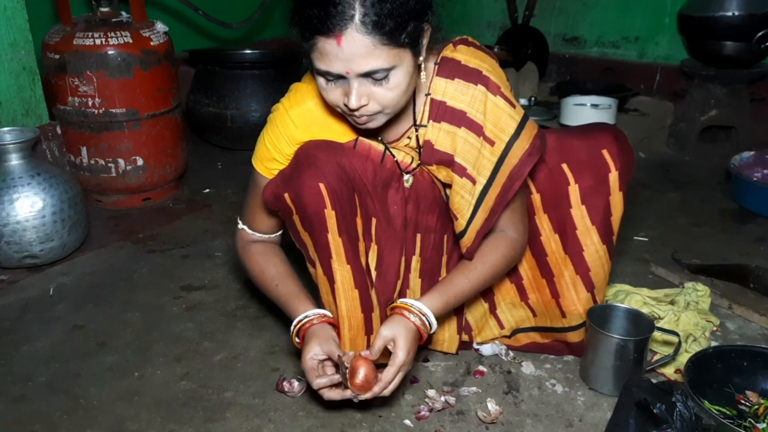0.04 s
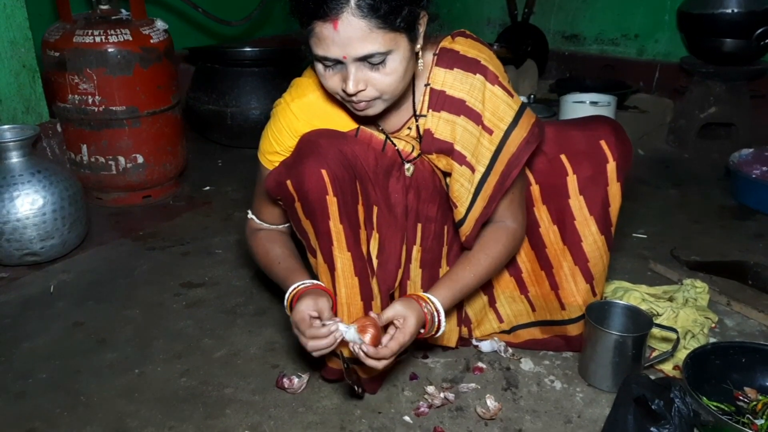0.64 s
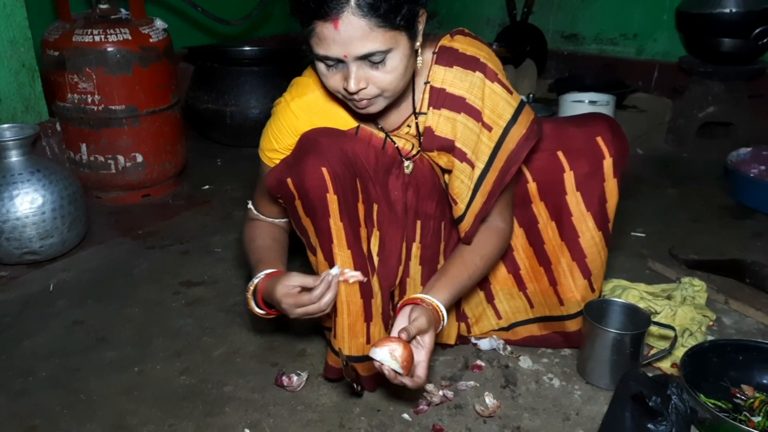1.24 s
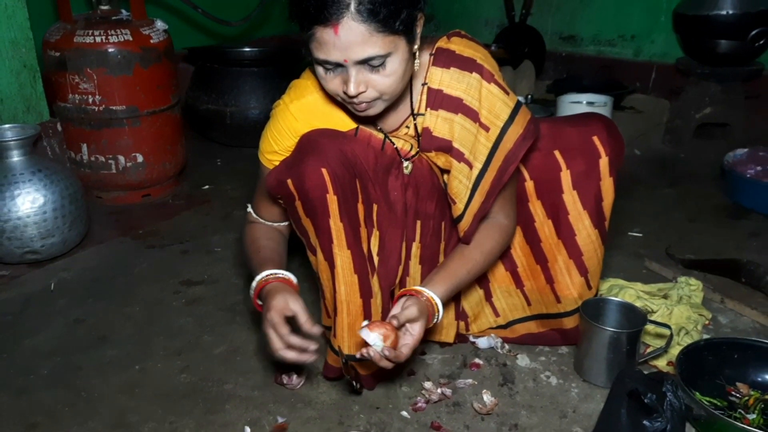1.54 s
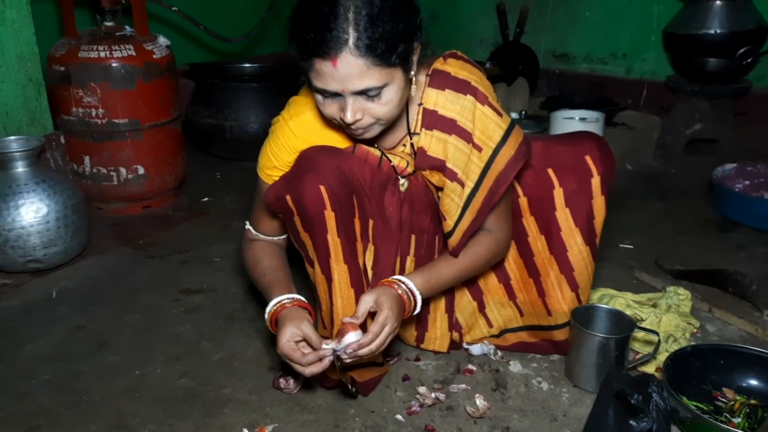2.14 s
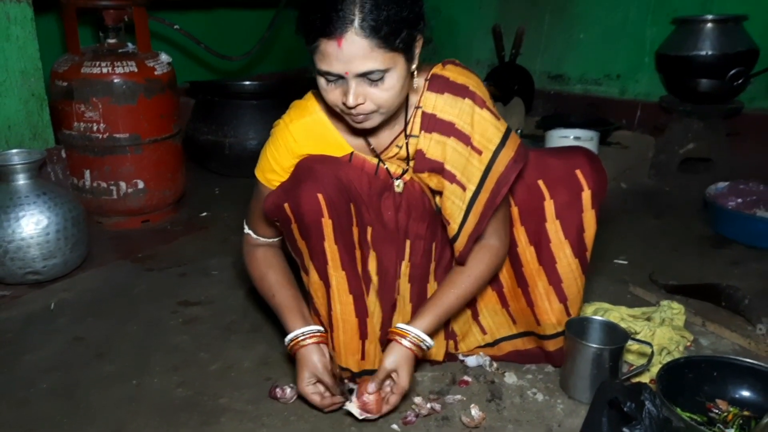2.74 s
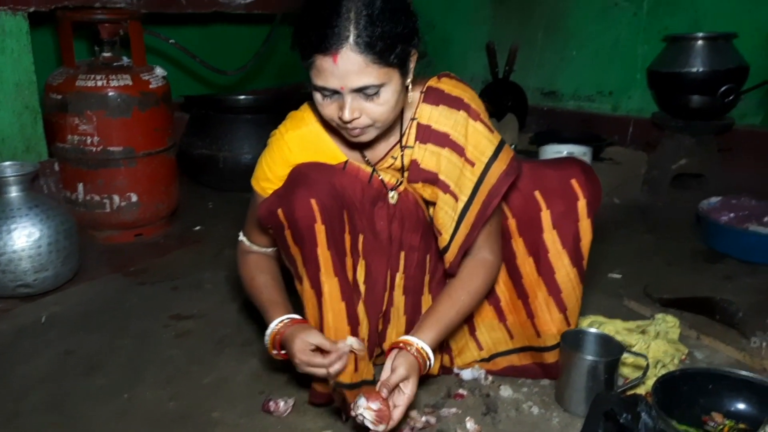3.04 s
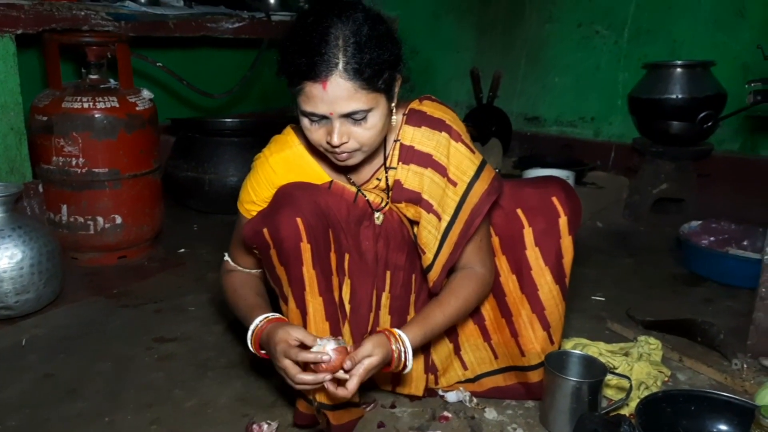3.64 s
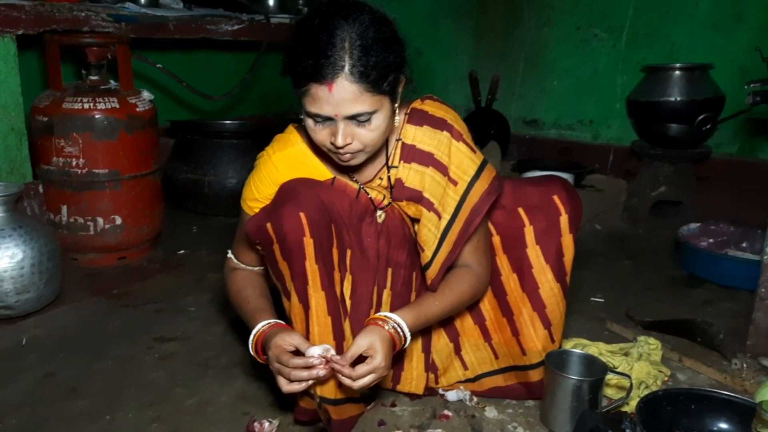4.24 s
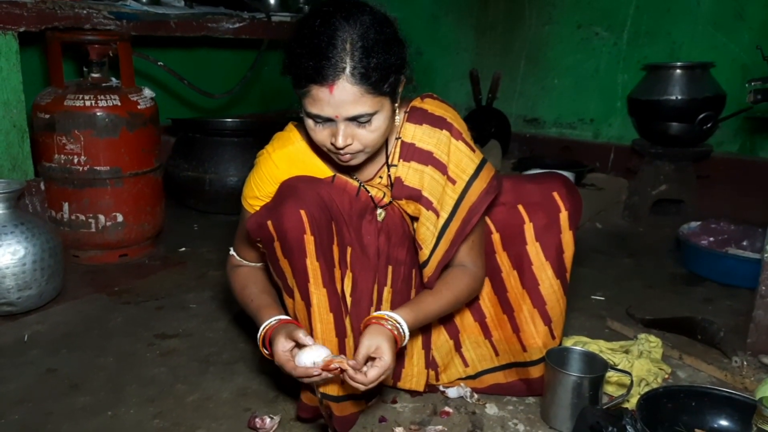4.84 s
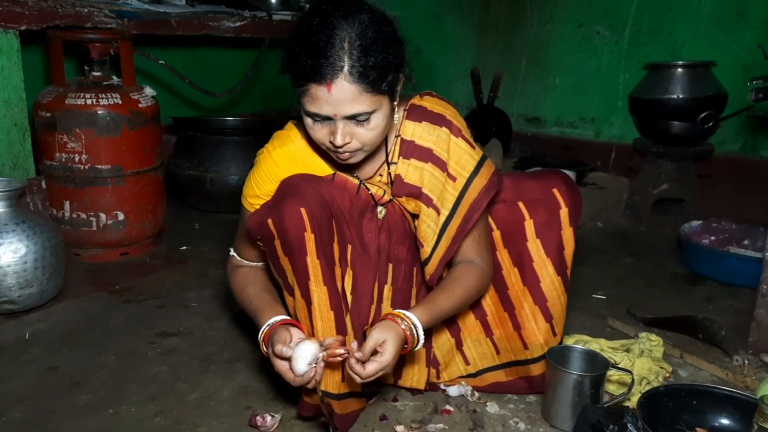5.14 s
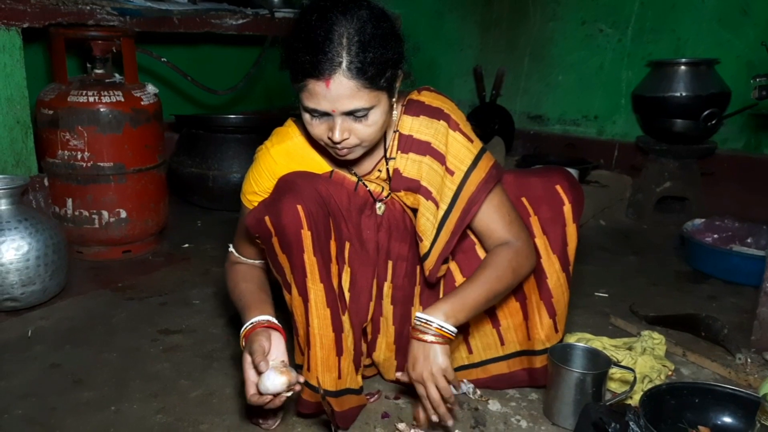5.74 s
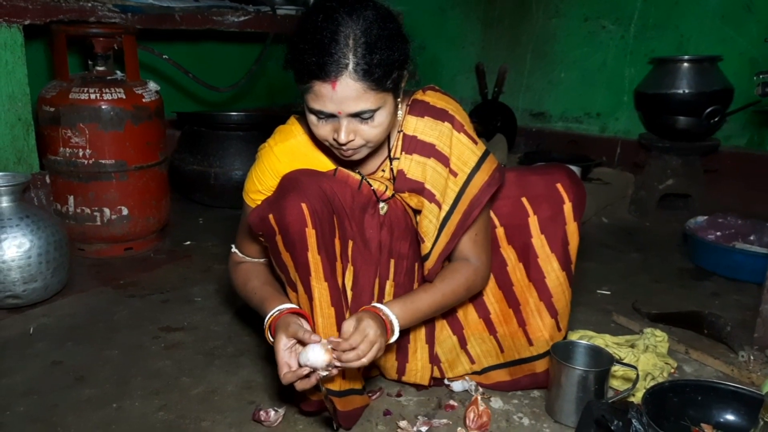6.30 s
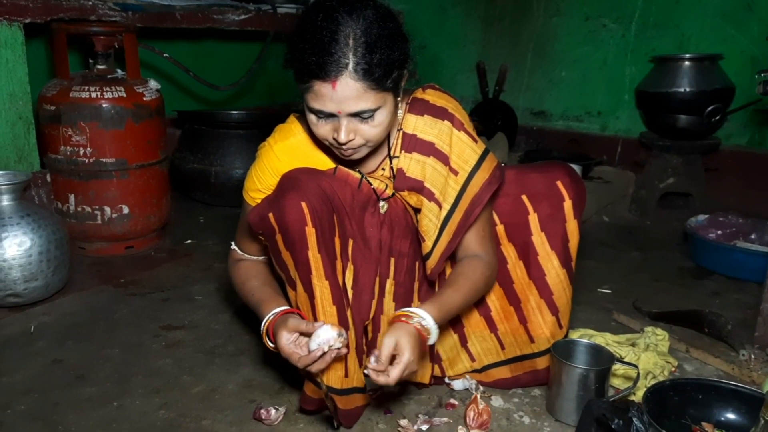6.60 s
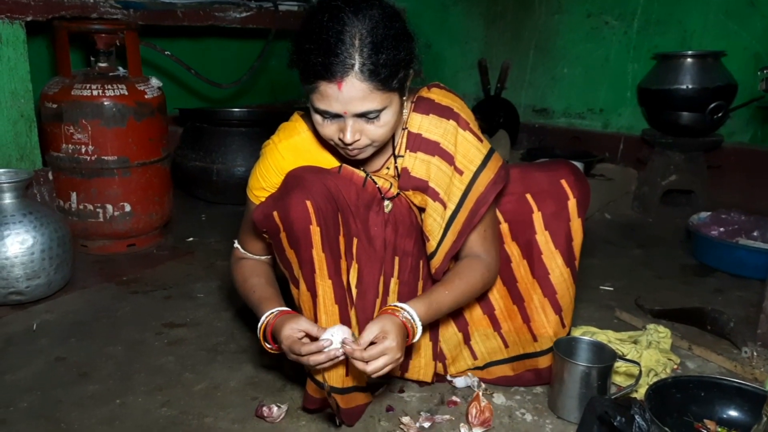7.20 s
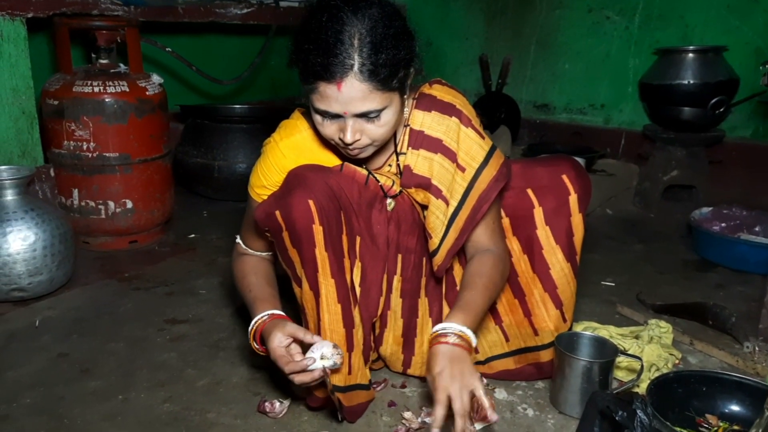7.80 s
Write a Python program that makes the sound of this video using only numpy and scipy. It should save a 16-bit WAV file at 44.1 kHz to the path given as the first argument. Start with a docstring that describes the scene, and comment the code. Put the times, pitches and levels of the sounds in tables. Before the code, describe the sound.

Fingers peel dry, papery skin off an onion in a small, quiet kitchen. Each pull is a brief crackling rustle with a few sharper snaps and light fingertip rubbing. The pulls come in irregular clusters, loudest a little before and a little after the middle, then thin out to faint ticks. The sound is fairly close, with slight room reflection over a faint hum and hiss.

```python
"""A dry crackle, pull after pull: fingers peel papery skin off a garlic bulb in a small kitchen.
Each pull is a swarm of tiny fractures with a few louder snaps; the freed flake flexes, fingertips
rub and knock on the bulb. Hard floor and walls smear the cracks into a rustle.
Underneath: faint mains hum, low room murmur, hiss with a narrow high band, soft bumps of hands
and feet, and a far drone that comes and goes."""
import sys
import numpy as np
from scipy import signal
from scipy.fft import rfft, irfft
from scipy.io import wavfile
from scipy.ndimage import uniform_filter1d

SR = 44100
rng = np.random.default_rng(int(sys.argv[2]) if len(sys.argv) > 2 else 0)


def store_pcm(level_fs):
    """Save levels as 16-bit WAV."""
    pcm = np.round(np.clip(level_fs, -1, 1) * 32767).astype(np.int16)
    wavfile.write(sys.argv[1], SR, np.atleast_2d(pcm).T)


N = 346626
T = np.arange(N) / SR
HZ = np.fft.rfftfreq(N, 1 / SR)

# room murmur spectrum: f/Hz, relative level/dB
MURMUR_SPECTRUM = [(25, -20), (50, -8), (85, -0.5), (120, 0), (150, -10.5), (220, -6.5), (300, -11),
                   (500, -15.5), (800, -24), (1500, -27.5), (4000, -57)]
# hiss spectrum: f/Hz, relative level/dB
HISS_SPECTRUM = [(200, 5), (1500, -1), (2600, 6.5), (5000, 1), (6000, 0), (8200, 6.5), (10300, 0.5),
                 (12300, 2.5), (14000, 2.5), (15500, 5.5)]
# hum: f/Hz, level/dB, waver/0-1
HUM_TONES = [(99.8, -72, .5), (223, -87.5, 0.92)]
# far tones: start/s, end/s, f/Hz, level/dB
DRONE_TONES = [(2.043, 2.494, 441, -76.5), (3.15, 3.755, 496, -83.5), (4.553, 4.847, 440, -83.5),
               (4.865, 5.095, 440, -67.5)]
# hands and feet: t/s, relative level/dB
BODY_BUMPS = [(0.71, -65), (0.997, -59.5), (1.189, -59.5), (2.442, -51), (2.799, -53.5), (3.018, -51),
              (6.331, -65), (7.399, -57), (7.458, -54.5), (7.509, -64)]
# floor and wall reflections: delay/s, spread/s, level/dB
EARLY_ECHOES = [(.0003, 0.0063, -14.5), (.0022, 0.001, -8.5), (.009, 0.0013, -23), (0.0099, 0.0031, -27.5)]
# kitchen decay: f/Hz, T60/s
KITCHEN_T60 = [(300, 0.41), (1300, 0.33), (3500, 0.34), (9000, .34), (15000, 0.27)]
# spectrum of breaking skin: f/Hz, relative level/dB
SKIN_SPECTRUM = [(130, -10.5), (220, -13), (350, -8), (600, -7), (1100, -8.5), (1500, -9), (2200, -3.5),
                 (3600, -4.5), (6600, 6.5), (9500, 0.5), (12300, 2), (14000, 0), (15500, -4.5)]
# resonances and one dip of the held bulb: f/Hz, width/Hz, gain/dB
BULB_RESONANCES = [(730, 90, 3.5), (880, 120, 5), (1120, 150, -3), (1500, 180, 5), (2480, 220, 3.5),
                   (2950, 200, 2.5)]
# loose skin crackling during and between pulls: t/s, relative level/dB
LOOSE_CRACKLE = [(0.0, -55.5), (0.65, -78.5), (0.83, -56), (1.09, -58), (1.36, -76), (2.19, -75.5),
                 (2.65, -50), (2.96, -56.5), (3.17, -70.5), (3.94, -75.5), (4.9, -57), (5.25, -61),
                 (5.98, -77.5), (7.86, -82)]
# fingertip on the bulb: t/s, level/dB
FINGER_KNOCKS = [(0.041, -32.5), (1.185, -24.5), (4.833, -16.5)]
# single loud fractures: t/s, level/dB, flex/dB re level
SKIN_SNAPS = [(0.043, -26, 5), (0.4012, -20, -39), (1.0053, -10, -9.5), (1.0623, -23, -25),
              (1.1858, -5.5, -6), (1.554, -27, -9), (2.202, -25, -20), (2.3406, -12, -12),
              (2.499, -10, -15), (2.5587, -13, 3.5), (2.65, -5.5, -2.5), (2.6897, 1.5, -16), (2.708, 2, -3),
              (3.4335, -22, -9), (3.682, -20, -13.5), (4.099, -28.5, -13.5), (4.2417, -13, -25),
              (4.408, -34, 10.5), (4.5416, -28.5, 3), (4.6948, -16.5, -16.5), (4.73, -5.5, -27),
              (4.775, 3, -15.5), (5.047, -13.5, 0), (5.0991, -14, 1.5), (5.291, -20, -5),
              (5.3765, -11.5, -13.5), (5.4301, -9, -12), (5.814, -13, -25), (7.032, -33.5, -29),
              (7.2893, -30.5, -28)]
# pulls: start/s, rise/s, length/s, effort/dB, flex/dB re effort, rub/dB re effort,
# dryness as treble gain/dB, resonance of the finger pocket/Hz
SKIN_PULLS = [(0.0, 0.0013, 0.052, -43, -11.5, -26.5, -1.5, 2680),
              (0.19, 0.066, 0.14, -63.5, -17, -20, 1.5, 4000), (0.592, 0.062, 0.21, -42, -6, -34, -1, 2600),
              (0.793, 0.013, 0.05, -29, -7.5, -39, -11, 5640),
              (0.837, 0.028, 0.17, -41, -1, -20.5, 3, 2200), (1.11, 0.044, 0.08, -36, -3, -17, 1, 2160),
              (1.526, 0.023, 0.045, -58, 0.5, -15.5, 0, 2380),
              (2.2, .01, 0.15, -61.5, -12, -25, -3.5, 2470), (2.336, 0.009, 0.072, -56, -1, -24, 1, 2430),
              (2.421, 0.063, 0.16, -46, -5, -23.5, 2.5, 2360),
              (2.654, .01, 0.052, -39.5, 3.5, -21, 0.5, 2280),
              (2.678, 0.016, 0.091, -27, -7, -26, -3, 2050),
              (2.929, 0.068, 0.14, -29.5, -5.5, -18, .5, 2300),
              (3.285, 0.019, 0.099, -65.5, -6, -34, 2, 2430),
              (3.41, .018, 0.062, -55.5, -9.5, -37, -2, 2410),
              (3.673, 0.0087, 0.078, -64.5, -5.5, -12, -2.5, 2350),
              (4.362, 0.068, 0.082, -52.5, -2, -28, 4.5, 2240),
              (4.528, 0.016, .11, -59, -4, -37.5, -1.5, 2550),
              (4.687, 0.042, .12, -38.5, -0.5, -27.5, -5, 2530),
              (4.798, 0.013, .085, -45.5, 8.5, -9.5, 4, 1450),
              (5.004, 0.029, 0.12, -51.5, 6.5, -2, 0, 3700),
              (5.148, 0.023, 0.17, -59.5, 3.5, -12.5, 0.5, 2980),
              (5.411, 0.017, 0.038, -35.5, -1, -23, -5, 2850),
              (5.809, 0.032, 0.052, -44.5, -4.5, -16.5, -9, 4270),
              (6.408, 0.034, 0.056, -61.5, -8.5, -35, 3, 2580),
              (7.412, 0.021, 0.18, -67.5, -15, -24, 1.5, 4540)]
# microphone ports: f/Hz, left minus right/dB
PORT_BALANCE = [(100, 0), (500, 2.5), (1200, 1), (2400, -5), (4300, -2), (6000, -5.5), (7200, -11),
                (8050, -0.5), (8800, 19), (9600, 6.5), (10700, 12), (11600, 5), (15000, 1.5)]

# layer timing in a pull: lag/s, change along the pull/dB, release time constant/s
TEAR, FLEX, RUB = (0, -2.3, 0.012), (0.001, 0.94, 0.032), (0.008, 3.6, 0.034)
START_S, RISE_S, LENGTH_S, EFFORT_DB, FLEX_DB, RUB_DB, DRYNESS_DB, POCKET_HZ = np.transpose(SKIN_PULLS)


def amp(db):
    """Decibels to gain."""
    return 10 ** (np.asarray(db) / 20)


def lookup(table, hz):
    """Interpolates on a log-frequency axis."""
    f, value = np.transpose(table)
    return np.interp(np.log(hz + 1), np.log(f + 1), value)


def add(mix, at_s, sound):
    """Mixes a sound in, in place."""
    part = mix[max(round(at_s * SR), 0):][:len(sound)]
    part += sound[:len(part)]


def noise(gain):
    """Noise of rms 1, shaped by a gain per frequency."""
    x = irfft(rfft(rng.standard_normal(N)) * gain, N)
    return x / np.sqrt(np.mean(x ** 2) + 1e-20)


def drift(rate_hz):
    """Slow random motion of rms 1."""
    return noise(np.exp(-(HZ / rate_hz) ** 2))


def room_murmur(level_db=-71.5, shared_power=0.39):
    """Low stereo noise, partly common to both sides."""
    gain = amp(lookup(MURMUR_SPECTRUM, HZ))
    shared = np.sqrt(shared_power) * noise(gain)
    separate = np.sqrt(1 - shared_power) * np.array([noise(gain), noise(gain)])
    return amp(level_db) * (shared + separate)


def mains_hum():
    """Low tones wavering in level and phase."""
    hum = np.zeros(N)
    for hz, db, waver in HUM_TONES:
        wobble = waver * (drift(11) + 1j * drift(9.5))
        hum += amp(db) * ((np.sqrt(2) + wobble) * np.exp(2j * np.pi * hz * T)).real
    return hum


def hiss(broad_db=-75, band_db=-68.5, band_hz=6850, half_width_hz=365, flutter_db=2.4, lean_db=1):
    """Even hiss plus a narrow fluttering band; separate noise per side, leaning right."""
    broad_gain = amp(lookup(HISS_SPECTRUM, HZ))
    band_gain = 1 / (1 + abs((HZ - band_hz) / half_width_hz) ** 3)
    band_level = amp(band_db + flutter_db * drift(12))
    return np.array([amp(side_db) * (amp(broad_db) * noise(broad_gain) + band_level * noise(band_gain))
                     for side_db in (-lean_db, lean_db)])


def far_drone(waver=0.0193):
    """Unsteady tones that fade in and out."""
    drone = np.zeros(N)
    for start_s, end_s, hz, db in DRONE_TONES:
        fade = np.sin(np.pi * np.clip((T - start_s) / (end_s - start_s), 0, 1))
        phase = 2 * np.pi * np.cumsum(hz * (1 + waver * drift(38))) / SR
        drone += amp(db) * fade * np.sqrt(2) * np.sin(phase)
    return drone


def body_bumps(centre_hz=92, width_oct=1.0, rise_s=0.023, gain_db=-7):
    """Short swells of rumble as the body shifts."""
    swell = np.zeros(N)
    age = T[:SR // 2] / rise_s
    for at_s, db in BODY_BUMPS:
        add(swell, at_s - rise_s / 2, amp(db + gain_db) * age * np.exp(1 - age))
    octaves = np.log2((HZ + 1) / centre_hz)
    return swell * noise(np.exp(-(octaves / width_oct) ** 2))


def room_path(direct_db, mean_lag_s, tail_db=-3, build_s=0.0058):
    """One hand position to one microphone: diffuse tail, early echo clusters, direct sound."""
    t = T[:SR // 2]
    hz, frame_s, spectra = signal.stft(rng.standard_normal(len(t)), SR, nperseg=256)
    decay = amp(-60 * frame_s / lookup(KITCHEN_T60, hz)[:, None])
    tail = signal.istft(spectra * decay, SR, nperseg=256)[1][:len(t)]
    tail *= 1 - np.exp(-(t / build_s) ** 2)
    response = amp(tail_db) * tail / np.linalg.norm(tail)
    for delay_s, spread_s, db in EARLY_ECHOES:
        cluster = rng.standard_normal(len(t)) * np.exp(-t / spread_s)
        add(response, delay_s, amp(db) * cluster / np.linalg.norm(cluster))
    add(response, mean_lag_s * 2 * rng.random(), amp([direct_db]))
    return response


def kitchen(x, direct_db, mean_lag_s, shifts_per_s=22, paths=7):
    """Cracks wander over the bulb, so the sound crossfades from path to path."""
    heard = np.zeros(N)
    for k in range(paths):
        share = np.sin(np.pi / 2 * np.minimum((T * shifts_per_s - k) % paths, 2))
        heard += signal.oaconvolve(x * share, room_path(direct_db, mean_lag_s))[:N]
    return heard


def grip(values):
    """Holds one value per pull; glides to the next as the fingers regrip."""
    times_s = np.column_stack([START_S + RISE_S / 2, START_S + LENGTH_S]).ravel()
    return np.interp(T, np.maximum.accumulate(times_s), np.repeat(values, 2))


def air_pocket(x, width_hz=900, strength=0.51):
    """Air between fingers and bulb rings at a pitch set by the grip."""
    carrier = np.exp(2j * np.pi * np.cumsum(grip(POCKET_HZ)) / SR)
    pole = np.exp(-np.pi * width_hz / SR)
    baseband = signal.lfilter([1 - pole], [1, -pole], x / carrier)
    ring = 2 * (carrier * baseband).real
    return (x + strength * ring) / np.sqrt(1 + 0.92 * strength)  # offsets the added energy


def skin_ring(drive, lo_hz, hi_hz, order=14):
    """Rings skin and held bulb within one band; minimum-phase response of energy 1."""
    hz = abs(np.fft.fftfreq(2048, 1 / SR)) + 1
    bulb_db = sum(db / (1 + (2 * (hz - f) / width) ** 2) for f, width, db in BULB_RESONANCES)
    rolloff = np.sqrt((1 + (lo_hz / hz) ** order) * (1 + (hz / hi_hz) ** order))
    gain = amp(lookup(SKIN_SPECTRUM, hz) + bulb_db) / rolloff
    log_spectrum = np.conj(signal.hilbert(np.log(gain + 1e-4)))
    ring = np.fft.ifft(np.exp(log_spectrum)).real
    return signal.oaconvolve(drive, ring / np.linalg.norm(ring))[:N]


def dryness(x, corner_hz=8000):
    """Thick, supple layers lose treble; thin, dry ones gain it."""
    treble = irfft(rfft(x) / (1 + (corner_hz / (HZ + 1)) ** 12), N)
    return x + (amp(grip(DRYNESS_DB)) - 1) * treble


def pull_envelope(levels_db, lag_s, change_db, release_s, sag_db_per_s=33):
    """One layer's strength: each pull swells, eases off, dies away; pulls add in power."""
    grid_s = T[::32]
    age_s = np.maximum(grid_s[:, None] - START_S - lag_s, 0)
    held_s = np.minimum(age_s, LENGTH_S)
    rise = np.minimum(age_s / RISE_S, 1) ** 2
    hold_db = change_db * (held_s / LENGTH_S - 0.5) - sag_db_per_s * (held_s - LENGTH_S / 2)
    release = np.exp(-(age_s - held_s) / release_s)
    pulls = rise * amp(levels_db + hold_db) * release
    return np.interp(T, grid_s, np.linalg.norm(pulls, axis=1))


def fractures(per_s, spread_db, decay_s, flakes=24):
    """A swarm of cracks of very uneven size; each flake colours its own."""
    sizes = amp(spread_db * np.minimum(rng.exponential(1, N), 5))
    sizes *= rng.random(N) < per_s / SR
    # the fingers feed in energy steadily, however the cracks share it
    sizes /= np.sqrt(abs(uniform_filter1d(sizes ** 2, size=900)) + 1e-9)
    flake = rng.integers(0, flakes, N)
    t = T[:64]
    swarm = np.zeros(N)
    for k in range(flakes):
        click = rng.standard_normal(len(t)) * np.exp(-t / decay_s)
        swarm += np.convolve(sizes * (flake == k), click / np.linalg.norm(click))[:N]
    return swarm


def snap(run_db=-8, run_s=0.0038, run_per_s=1200):
    """One sharp break, then the tear runs on in smaller cracks; energy 1."""
    t = T[:SR // 20]
    run = rng.standard_normal(len(t)) * np.exp(-t / run_s)
    run *= rng.random(len(t)) < run_per_s / SR
    burst = amp(run_db) * run / (np.linalg.norm(run) + 1e-9)
    burst[0] = 1
    return burst / np.linalg.norm(burst)


def fingertips(gain_db=-1):
    """Fingers rub the bulb in tiny slips and now and then knock on it."""
    slips = fractures(per_s=2000, spread_db=3, decay_s=0.0002)
    drive = amp(gain_db) * pull_envelope(EFFORT_DB + RUB_DB, *RUB) * slips
    for at_s, db in FINGER_KNOCKS:
        add(drive, at_s, amp(db) * snap())
    return drive


def peeling(cracks_per_s=1300, at_effort_db=-45, crowding=0.33, flex_gain_db=-2.5, thud_db=-22):
    """Harder pulls break more fibres; cracks fizz (treble) and flex the sheet (mid), fingers rub (low)."""
    loose = amp(np.interp(T, *np.transpose(LOOSE_CRACKLE)) - 1.5)
    tearing = np.hypot(pull_envelope(EFFORT_DB, *TEAR), loose)
    flexing = np.hypot(pull_envelope(EFFORT_DB + FLEX_DB, *FLEX), amp(-4) * loose)
    rate_per_s = cracks_per_s * (tearing / amp(at_effort_db)) ** crowding
    cracks = fractures(rate_per_s, spread_db=5, decay_s=0.00019)
    fingers = fingertips()
    snaps, snap_flex = np.zeros((2, N))
    for at_s, db, flex_db in SKIN_SNAPS:
        burst = amp(db) * snap()
        add(snaps, at_s, burst)
        add(snap_flex, at_s, amp(flex_db) * burst)
    tear = skin_ring(tearing * cracks + snaps, lo_hz=4000, hi_hz=SR / 2)
    flex = skin_ring(amp(flex_gain_db) * flexing * cracks + snap_flex, lo_hz=1200, hi_hz=4000)
    rub = skin_ring(fingers + amp(thud_db) * snap_flex, lo_hz=180, hi_hz=1200)
    return dryness(tear + flex + rub)


def scene():
    """The hands face the left microphone more squarely; the right gets less direct sound."""
    hands = air_pocket(peeling())
    left = kitchen(hands, direct_db=-9, mean_lag_s=0)
    right = kitchen(hands, direct_db=-11, mean_lag_s=0.00014)
    return np.array([left, right]) + body_bumps() + far_drone() + room_murmur() + mains_hum() + hiss()


def record(dry, cutoff_hz=15700):
    """Each microphone port colours its channel; then a low-pass."""
    ratio = amp(lookup(PORT_BALANCE, HZ))
    ports = np.array([ratio, np.ones(len(HZ))]) * np.sqrt(2 / (1 + ratio ** 2))
    coloured = irfft(rfft(dry) * ports, N)
    lowpass = signal.firwin(401, cutoff_hz, window=("kaiser", 8), fs=SR)
    return signal.oaconvolve(coloured, lowpass[None], "same")


dry = scene()
out = record(dry)
store_pcm(out)
```